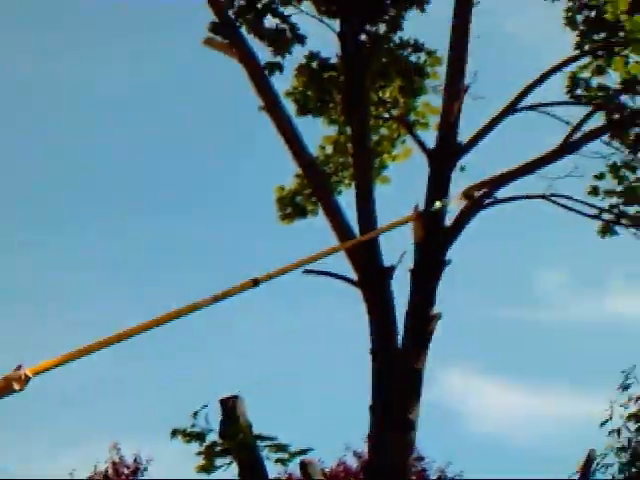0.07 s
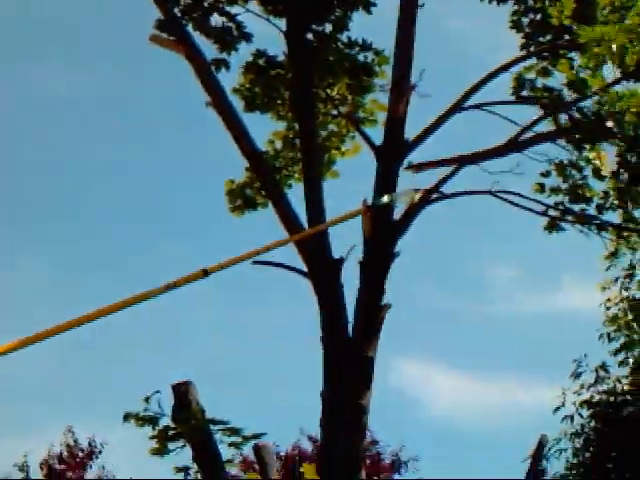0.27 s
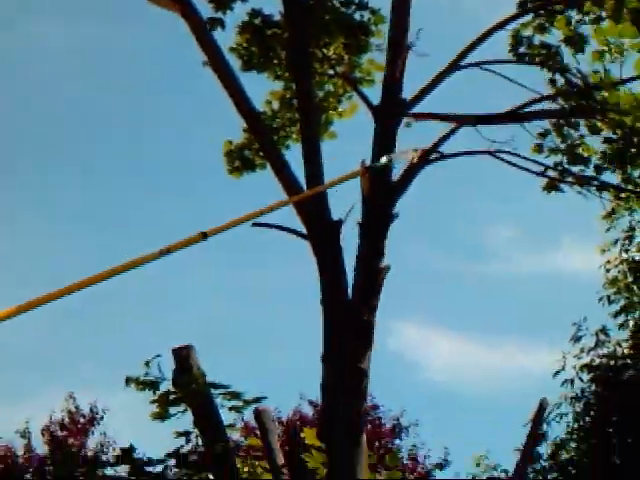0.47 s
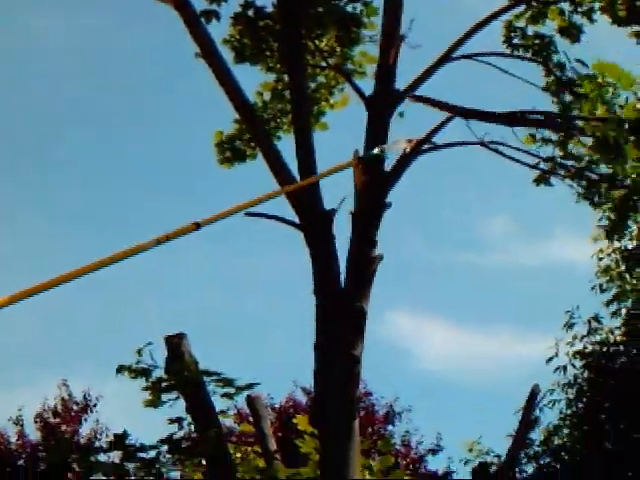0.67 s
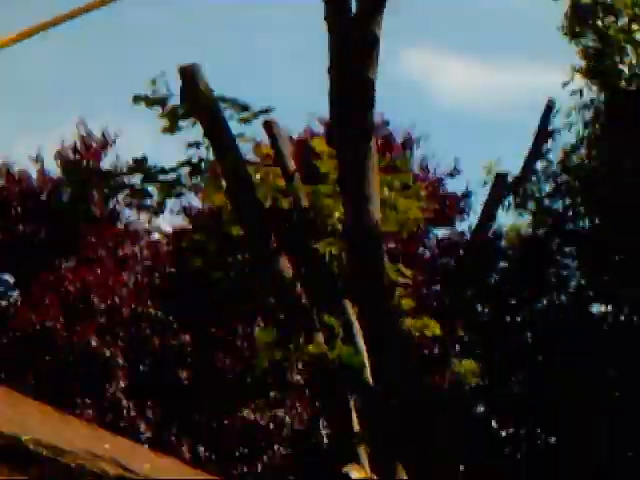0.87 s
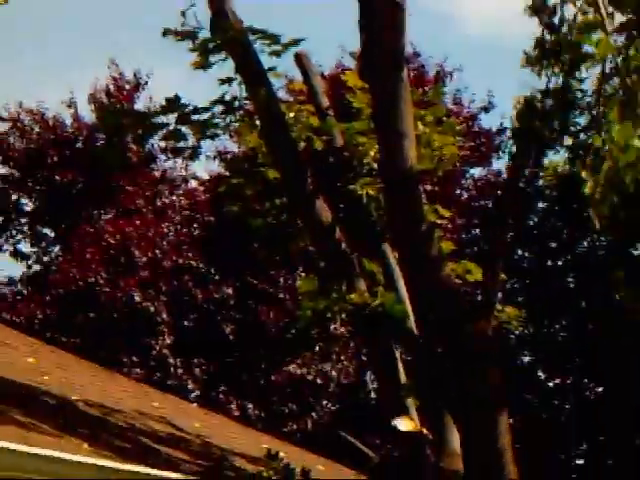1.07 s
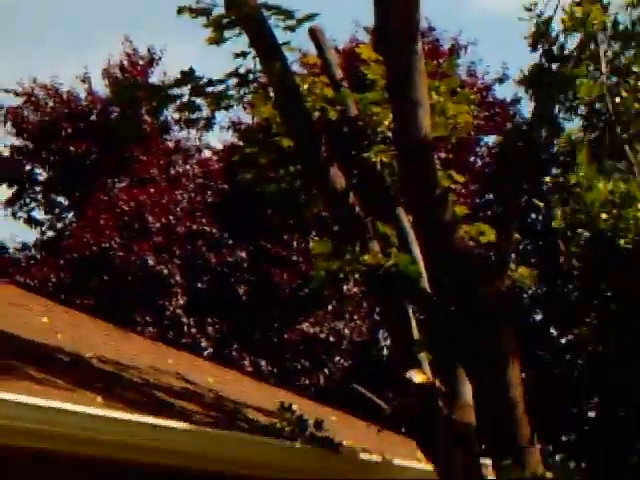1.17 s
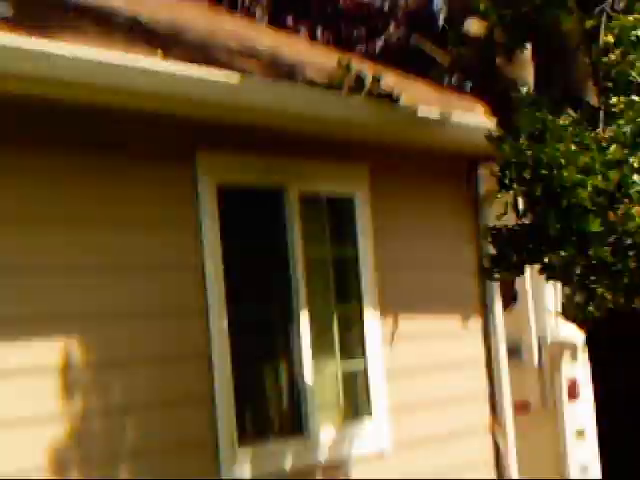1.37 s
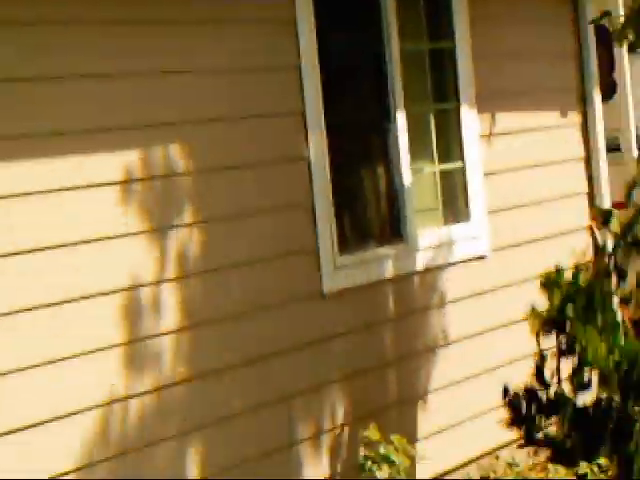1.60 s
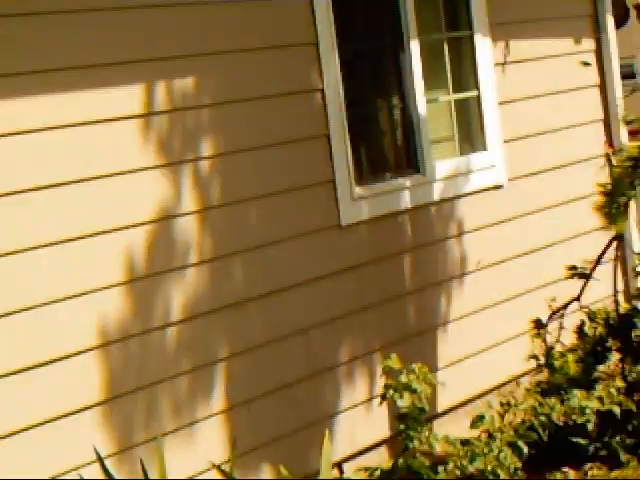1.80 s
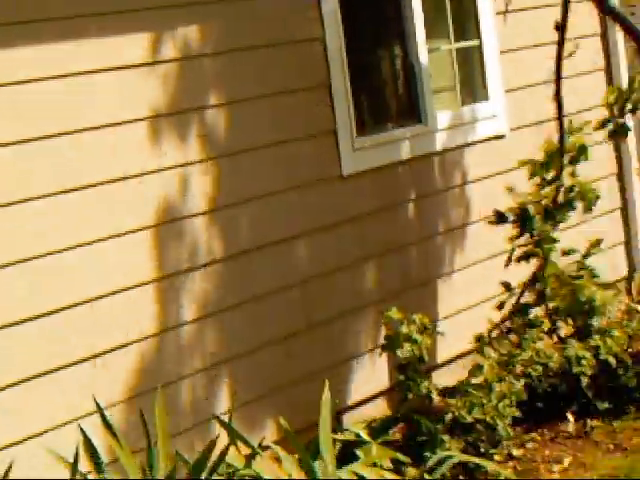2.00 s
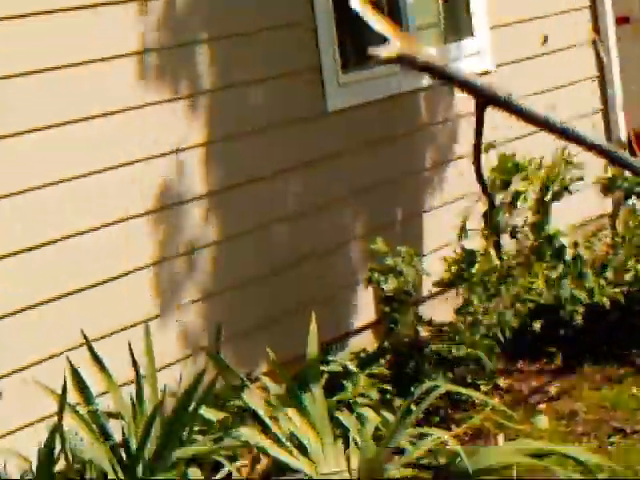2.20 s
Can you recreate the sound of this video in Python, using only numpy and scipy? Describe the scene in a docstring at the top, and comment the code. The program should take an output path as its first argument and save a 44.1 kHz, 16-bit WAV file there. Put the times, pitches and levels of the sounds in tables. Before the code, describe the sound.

A tree limb breaks with one sharp, splintering crack just after a pole saw knocks on the wood. The branch brushes down through leaves, crashes into shrubs with snapping twigs, and settles, with a light garden echo.

```python
"""A pole saw's last stroke dies away and the pole knocks on a half-cut limb. A few fibres tick.
At 0.23 s the limb breaks: one sharp crack, splintering and ringing wood, echoing round a garden.
The branch brushes through the crown, leaves slapping and sliding, and drops free.
From 1.5 s it crashes into the shrubs with a soft thump and snapping twigs.
Near 2 s its leafy sprays whip as it rocks and settles. Faint outdoor air throughout."""
import sys
import numpy as np
from scipy import signal
from scipy.fft import rfft, irfft, next_fast_len
from scipy.io import wavfile

SR = 44100
rng = np.random.default_rng(int(sys.argv[2]) if len(sys.argv) > 2 else 0)


def wav_out(sig):
    """Save sig, one row per channel (or a flat mono array), as 16-bit PCM at SR to the path in sys.argv[1]."""
    wavfile.write(sys.argv[1], SR, np.round(np.clip(np.atleast_2d(sig).T, -1, 1) * 32767).astype(np.int16))


N = 99225
T = np.arange(N) / SR

# last fibres giving way: start_s, level_db
FIBRE_BREAKS = [(0.2251, -9), (0.2268, -.5), (0.2342, -13.5), (0.2395, -16.5)]
# crack spectrum: freq_hz, gain_db
CRACK_EQ = [(100, -40), (700, -14), (1200, -10), (1700, -1), (2900, 4), (3600, -5), (4600, 2),
            (5900, -12.5), (9000, -16), (15500, -24.5)]
# splintering limb spectrum: freq_hz, gain_db
SPLINTER_EQ = [(70, -34), (150, -6.5), (300, -11.5), (570, -1.5), (700, -18), (880, -5), (1150, 2),
               (1900, -8), (3600, 0.5), (4500, -5), (6000, -8), (9000, -10.5), (15500, -25)]
# modes of the freed limb: pitch_hz, level_db, t60_s
LIMB_RING = [(556, -30, 0.071), (840, -20, 0.06), (933, -23, 0.084), (1560, -34, 0.11), (1640, -45, .07),
             (1925, -25.5, 0.088), (2160, -33, .12), (2455, -27, .13), (2835, -26, 0.084),
             (3110, -41, 0.074), (4130, -30, 0.11), (4240, -37, 0.049), (4467, -30, 0.11), (4611, -32, .09)]
# heavy wood thud spectrum: freq_hz, gain_db
THUD_EQ = [(40, -34), (85, -25), (150, -2), (450, -3.5), (900, -4), (2000, -41), (8000, -77)]
# single fibres and twigs snapping: start_s, body_db, edge_db
TWIG_SNAPS = [(0.1697, -42, -38), (0.1902, -31.5, -39), (0.2019, -31.5, -50), (0.358, -34, -46),
              (0.4173, -33, -36.5), (0.486, -43, -45), (.5366, -36.5, -36), (0.5511, -41, -35),
              (0.6755, -47, -41.5), (0.7423, -48, -46), (0.7784, -38.5, -58), (.7842, -36, -51),
              (0.8252, -53, -43), (0.9003, -50, -38), (0.928, -52, -34.5), (1.1468, -37.5, -50),
              (1.2591, -40.5, -40.5), (1.3027, -36, -48), (1.3075, -37, -52), (1.5544, -32, -26),
              (1.5575, -21.5, -25.5), (1.6742, -20, -24), (1.6864, -27, -36), (1.725, -27.5, -23),
              (1.7329, -22, -26), (1.7681, -24, -46), (1.788, -29, -46)]
# snap body spectrum: freq_hz, gain_db
SNAP_EQ = [(200, -11.5), (1200, -8), (2800, 3.5), (4500, -1), (7000, -15), (15500, -38)]
# bright snap edge spectrum: freq_hz, gain_db
EDGE_EQ = [(500, -40), (3000, -15), (6000, 0), (10000, 0), (15500, -9.5)]
# side shoots striking and splintering: start_s, level_db, t60_s
SHOOT_STRIKES = [(0.93, -40, 0.095), (1.086, -37.5, .07), (1.386, -40, 0.33), (1.5546, -26.5, 0.05),
                 (1.6701, -18, 0.019), (1.6790, -23.5, 0.04), (1.7223, -18.5, 0.015),
                 (1.7285, -18.5, 0.034)]
# shoot strike spectrum: freq_hz, gain_db
STRIKE_EQ = [(100, -26), (600, -7.5), (1400, -2), (2600, 4), (4600, -0.5), (6500, -9.5), (10000, -14),
             (15500, -24)]
# foliage brushing envelope: time_s, level_db
BRUSH_LEVELS = [(.1, -87), (.17, -55.5), (.33, -51), (.52, -52), (.74, -58.5), (.85, -50), (.95, -46),
                (1.06, -45.5), (1.1, -42.5), (1.18, -59.5), (1.28, -56.5), (1.39, -45), (1.45, -44.5),
                (1.52, -35.5), (1.64, -32.5), (1.7, -29.5), (1.755, -36.5), (1.9, -44.5), (2.01, -45.5),
                (2.055, -44), (2.13, -45.5), (2.25, -47.5)]
# leaf rustle spectrum: freq_hz, gain_db
LEAF_EQ = [(60, -16.5), (160, -16), (270, -6), (430, -13), (600, -3.5), (850, -4), (1300, -5.5),
           (1900, -3.5), (2600, 1), (4800, -3), (6500, -8), (10000, -11.5), (15500, -22)]
# saw stroke spectrum: freq_hz, gain_db
SAW_EQ = [(100, -6), (400, -6), (650, 4.5), (1100, -1.5), (2100, 0), (4200, -4), (6500, -10.5),
          (15500, -32)]
# pole hitting the wood and bouncing: start_s, level_db
POLE_KNOCKS = [(.0319, -20.5), (0.0396, -28)]
# pole contact spectrum: freq_hz, gain_db
KNOCK_EQ = [(100, -20), (380, -10.5), (600, 0), (1000, -7), (1300, -4), (2200, 3), (3500, -5.5),
            (6500, -9.5), (8500, -19.5), (10500, -15), (15500, -39)]
# modes of the knock: pitch_hz, level_db, t60_s
KNOCK_RING = [(587, -35.5, 0.067), (834, -36, 0.05), (975, -30.5, 0.046), (1870, -43, 0.026)]
# leafy sprays whipping: start_s, level_db, t60_s
SPRAY_WHIPS = [(2.0235, -34.5, 0.065), (2.0413, -32, 0.07), (2.0640, -37.5, 0.086), (2.1000, -33.5, .04)]
# whip spectrum: freq_hz, gain_db
WHIP_EQ = [(200, -32), (1400, -13), (2600, -0.5), (3500, 3), (5000, -1), (6500, -9), (10000, -12),
           (15500, -21)]
# far echo decay: freq_hz, t60_s
ECHO_DECAY = [(150, 0.54), (700, .36), (2300, 0.47), (5000, 0.47), (12000, 0.25)]
# garden echo spectrum: freq_hz, gain_db
ECHO_EQ = [(100, 0.5), (800, -1), (2000, 0), (4000, -5), (7000, -0.5), (15000, 0)]
# outdoor air spectrum: freq_hz, gain_db
AIR_EQ = [(18, -18), (36, 1.5), (55, -2), (110, -6), (270, -12), (450, -12.5), (800, -12.5), (1300, -14),
          (2700, -17.5), (5000, -17.5), (10000, -27.5), (15500, -33)]


def limb_crack(ring_start_s=0.2275):
    """Fibres tear and part in sharp reports; the wood splinters, rings and recoils with a thud."""
    tear = burst(FIBRE_BREAKS[0][0] - 0.003, db=-31, t60_s=0.05, attack_s=0.0023)
    breaks = sum(burst(s, db, t60_s=0.0072) for s, db in FIBRE_BREAKS)
    reports = colour(tear + breaks, CRACK_EQ)
    splinters = colour(burst(ring_start_s, db=-17.5, t60_s=0.077, attack_s=0.0036), SPLINTER_EQ)
    fine_fibres = burst(ring_start_s, db=-28.5, t60_s=0.27, attack_s=0.0032)
    fine_fibres = colour(fine_fibres, [(1500, -3.5), (4000, 1.5), (6500, -0.5), (9000, -14), (15500, -26)])
    thud = colour(burst(ring_start_s + 0.0042, db=-32.5, t60_s=0.13, attack_s=0.0017), THUD_EQ)
    return reports + splinters + fine_fibres + thud + ring(ring_start_s, LIMB_RING, attack_s=0.0031)


def twigs():
    """Dry snaps with bright edges; longer splintering where shoots strike."""
    snaps = sum(burst(s, db, t60_s=0.012) for s, db, _ in TWIG_SNAPS)
    edges = sum(burst(s, db, t60_s=0.0094) for s, _, db in TWIG_SNAPS)
    strikes = sum(burst(s, db, t60_s, attack_s=0.00037) for s, db, t60_s in SHOOT_STRIKES)
    strikes *= unit(amp(2.9 * wobble(rate_hz=1800)))
    return colour(snaps, SNAP_EQ) + colour(edges, EDGE_EQ) + colour(strikes, STRIKE_EQ)


def foliage(contacts_per_s=4200, spread_db=0.5):
    """Leaves slap in clumps, each with its own pitch, over the swish of leaves sliding."""
    pitches_hz = np.geomspace(1200, 12000, num=6)
    count = int(contacts_per_s * N / SR / len(pitches_hz))
    slaps = np.zeros(N)
    for hz in pitches_hz:
        when, sign, size = rng.random(4096), rng.choice([-1., 1.], 4096), rng.standard_normal(4096)
        strength = sign * amp(spread_db * np.clip(size, -2, 2))
        contacts = np.bincount((when[:count] * N).astype(int), strength[:count], N)
        clump = colour(contacts, [(hz / 4, -16), (hz, 0), (hz * 4, -24)])
        slaps += np.sqrt(hz) * clump * amp(0.67 * wobble(rate_hz=44.77))
    patter = amp(-3.5) * unit(colour(slaps, LEAF_EQ))
    swish = amp(-1.5) * unit(colour(rng.standard_normal(N), LEAF_EQ))
    level_db = np.interp(T, *np.transpose(BRUSH_LEVELS)) + wobble(rate_hz=60.2)
    return (patter + swish) * amp(level_db)


def pole_saw():
    """The last stroke dies away; the pole knocks hollowly and bounces."""
    stroke = colour(burst(0, db=-45, t60_s=0.51, attack_s=0.00061), SAW_EQ)
    stroke *= amp(1.3 * wobble(rate_hz=140))
    knock_s = POLE_KNOCKS[0][0]
    contacts = sum(burst(s, db, t60_s=0.0081) for s, db in POLE_KNOCKS)
    contacts += burst(knock_s, db=-29.5, t60_s=0.019)
    return stroke + colour(contacts, KNOCK_EQ) + ring(knock_s, KNOCK_RING, attack_s=0.0038)


def bough_landing():
    """The heavy end thumps down, cushioned by shrubs."""
    return colour(burst(start_s=1.5, db=-43, t60_s=0.17, attack_s=0.015), THUD_EQ)


def settling_sprays():
    """Outer sprays swish brightly as the branch rocks."""
    whips = sum(burst(s, db, t60_s, attack_s=0.0017) for s, db, t60_s in SPRAY_WHIPS)
    return colour(whips, WHIP_EQ)


def garden_echo(x, near_db=-12, far_db=-16):
    """Quick scatter from wall and trunks, then a longer tail from trees and houses."""
    hz, t, noise = signal.stft(rng.standard_normal(N), SR, nperseg=256)
    decay = amp(-60 * t / log_interp(ECHO_DECAY, hz)[:, None])
    far = signal.istft(noise * decay, SR, nperseg=256)[1][:N]
    far *= 1 - np.exp(-T / 0.025)
    near = burst(start_s=0.002, db=0, t60_s=0.2, attack_s=0.0033)
    response = amp(far_db) * far / np.linalg.norm(far) + amp(near_db) * near / np.linalg.norm(near)
    return signal.fftconvolve(x, colour(response, ECHO_EQ))[:N]


def outdoor_air(level_db=-56.5):
    """Still air: steady low rumble and faint hiss."""
    return amp(level_db) * unit(colour(rng.standard_normal(N), AIR_EQ))


def burst(start_s, db, t60_s, attack_s=0.0001):
    """Dying flurry of tiny fractures or contacts: random-sign noise."""
    span, envelope = fade(start_s, t60_s, attack_s)
    signs = 2. * rng.integers(0, 2, N, dtype=bool)[span] - 1
    out = np.zeros(N)
    out[span] = amp(db) * envelope * signs
    return out


def ring(start_s, modes, attack_s, wander_cycles=0.056):
    """Decaying modes of rough wood; each phase takes a random walk."""
    out = np.zeros(N)
    for hz, db, t60_s in modes:
        span, envelope = fade(start_s, t60_s, attack_s)
        t = T[span] - start_s
        drift = np.cumsum(rng.standard_normal(256))
        phase = rng.random() + wander_cycles * np.interp(t * 150, np.arange(len(drift)), drift)
        out[span] += amp(db) * envelope * np.sin(2 * np.pi * (hz * t + phase))
    return out


def fade(start_s, t60_s, attack_s):
    """Sample span and attack-decay envelope of one event."""
    span = slice(int(start_s * SR), min(N, int((start_s + 2 * t60_s) * SR)))
    t = np.maximum(T[span] - start_s, 0)
    return span, amp(-60 * t / t60_s) * (1 - np.exp(-t / attack_s))


def wobble(rate_hz):
    """Random curve through Gaussian knots."""
    knots = rng.standard_normal(8192)
    return np.interp(T * rate_hz, np.arange(len(knots)), knots)


def colour(x, eq, taps=2048):
    """Minimum-phase filter of unit power gain, shaped by eq."""
    gain = amp(log_interp(eq, np.fft.rfftfreq(taps, 1 / SR)))
    cepstrum = irfft(np.log(gain))
    cepstrum[1:taps // 2] *= 2
    cepstrum[taps // 2 + 1:] = 0
    impulse = irfft(np.exp(rfft(cepstrum)))
    return signal.oaconvolve(x, impulse / np.linalg.norm(impulse))[:N]


def log_interp(points, hz):
    """Read (freq_hz, value) points on a log axis."""
    freq_hz, values = np.transpose(points)
    return np.interp(np.log(hz + 1), np.log(freq_hz + 1), values)


def amp(db):
    """Decibels to gain."""
    return 10 ** (np.asarray(db) / 20)


def unit(x):
    """Scale to rms 1."""
    return x / np.sqrt(np.mean(x ** 2) + 1e-20)


def scene():
    """Wood and leaves, their echo and the air, in mono."""
    direct = pole_saw() + limb_crack() + twigs() + foliage() + bough_landing() + settling_sprays()
    air = outdoor_air()
    return (direct + garden_echo(direct) + air)[None]


def record(dry, cutoff_hz=16050):
    """Brick-wall low-pass."""
    size = next_fast_len(N + SR // 2)
    passband = np.fft.rfftfreq(size, 1 / SR) < cutoff_hz
    return irfft(rfft(dry, size) * passband, size)[..., :N]


dry = scene()
out = record(dry)
wav_out(out)
```